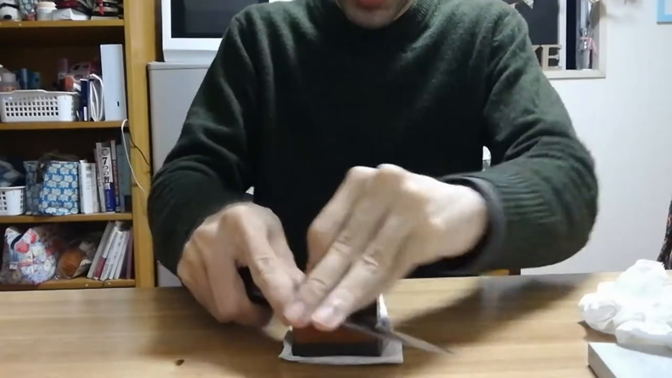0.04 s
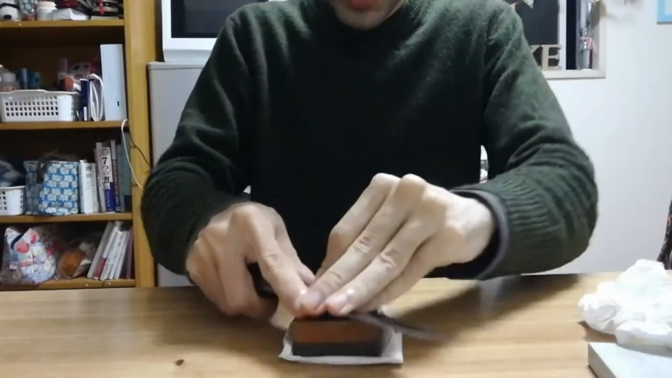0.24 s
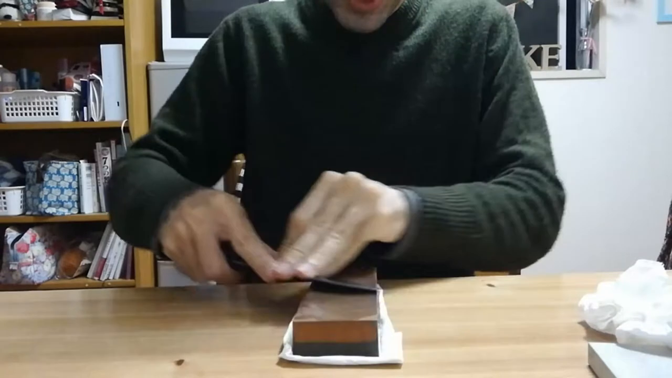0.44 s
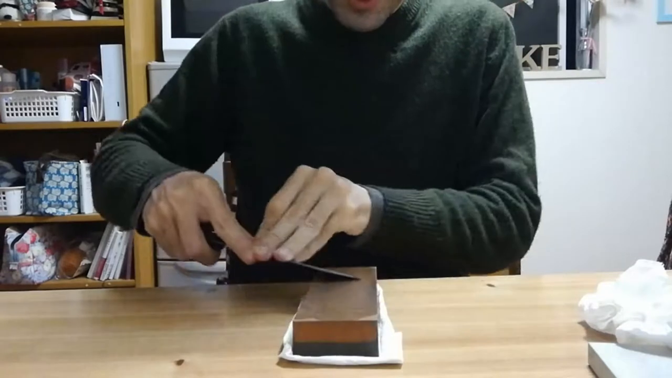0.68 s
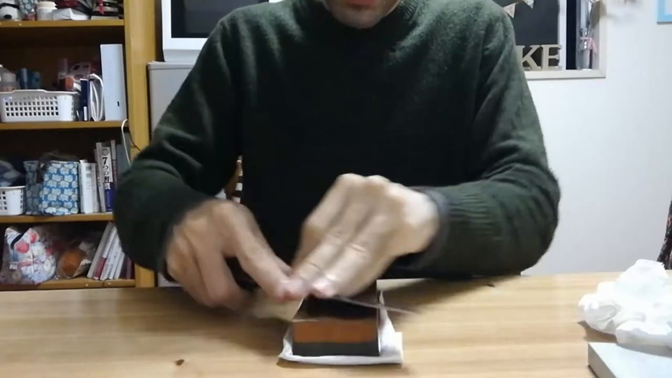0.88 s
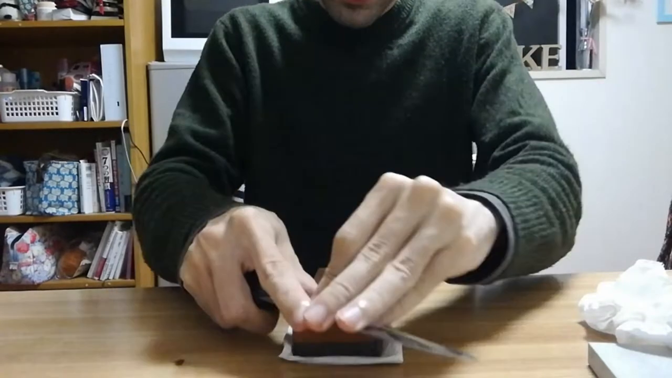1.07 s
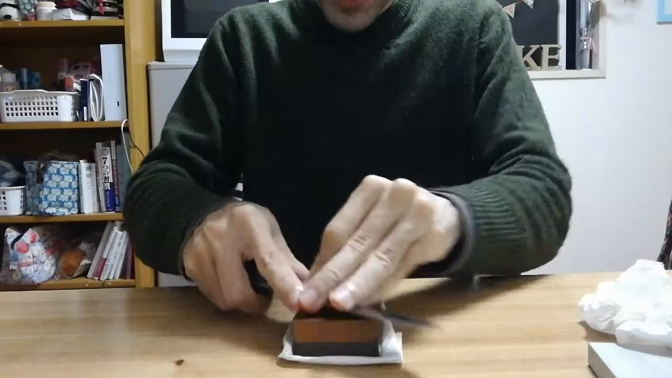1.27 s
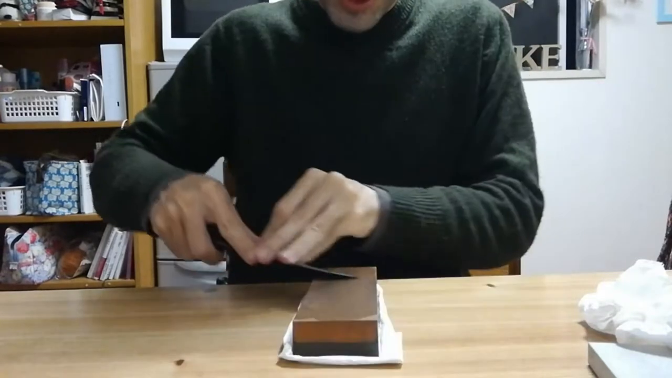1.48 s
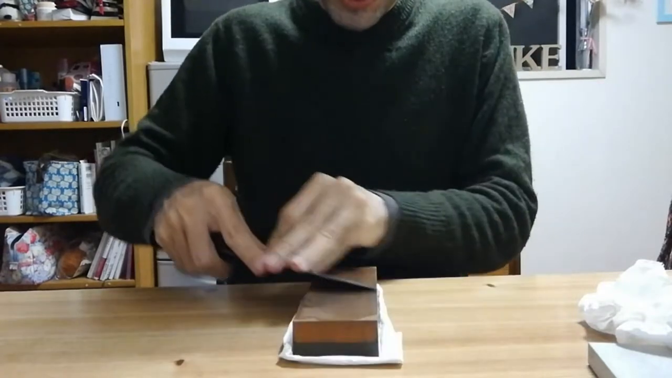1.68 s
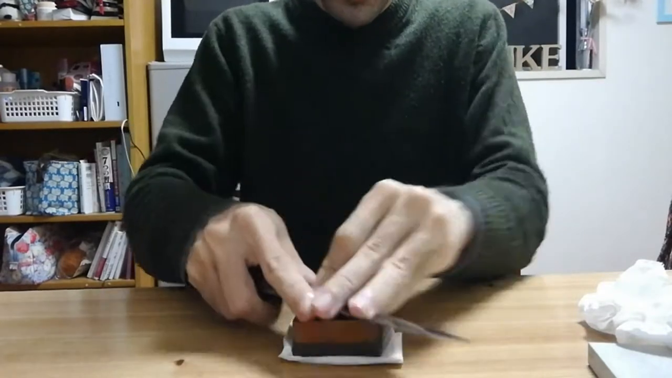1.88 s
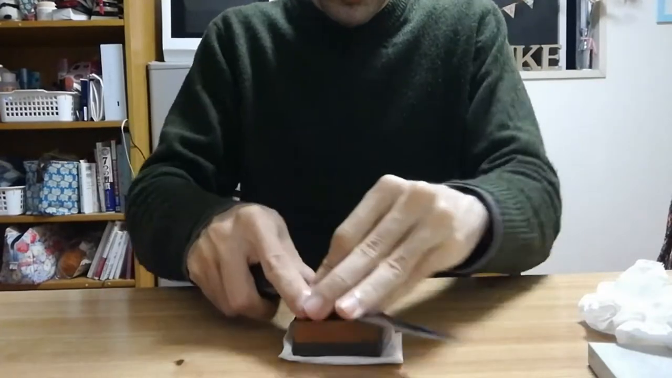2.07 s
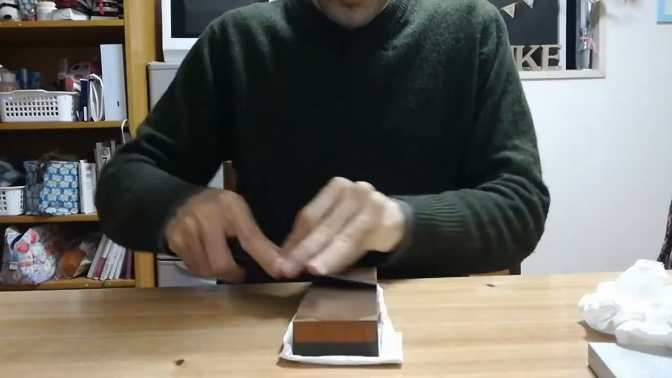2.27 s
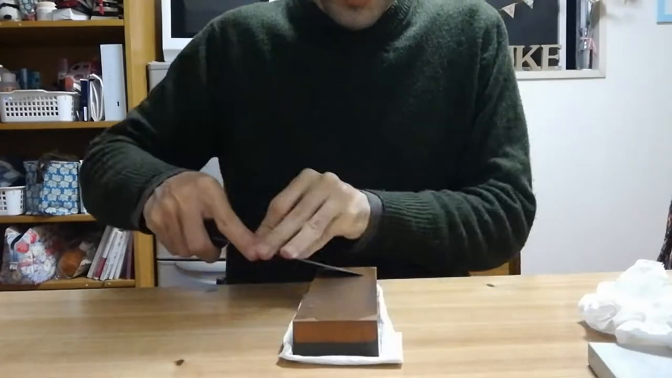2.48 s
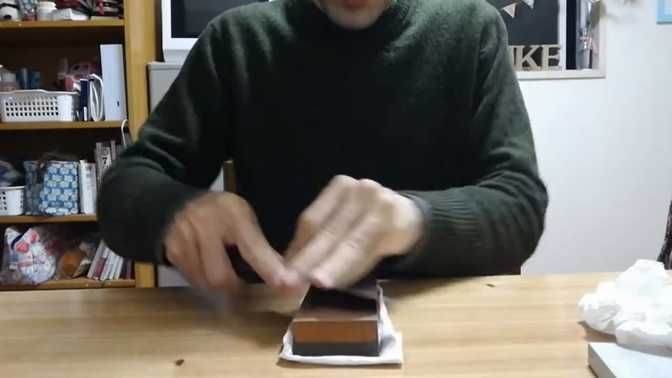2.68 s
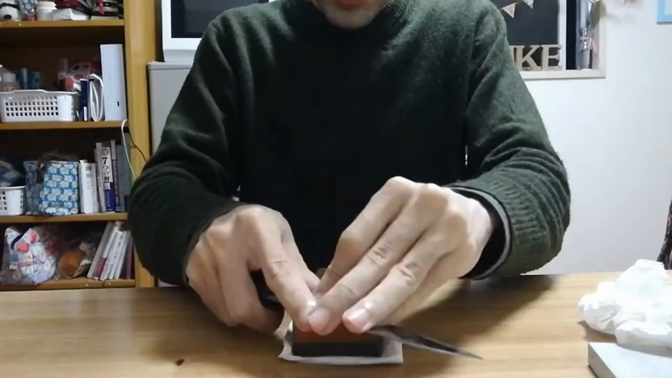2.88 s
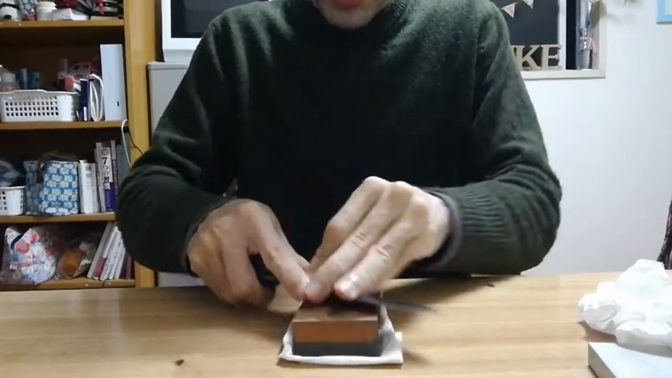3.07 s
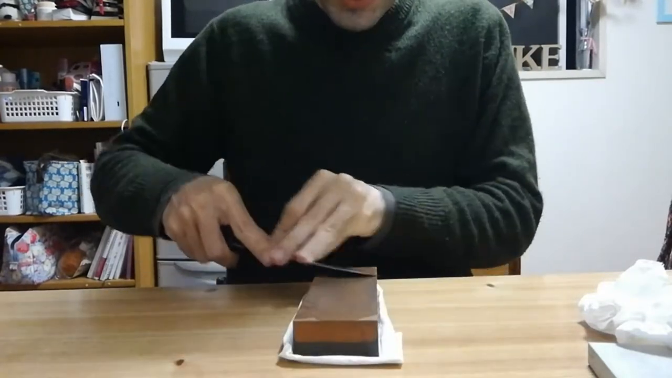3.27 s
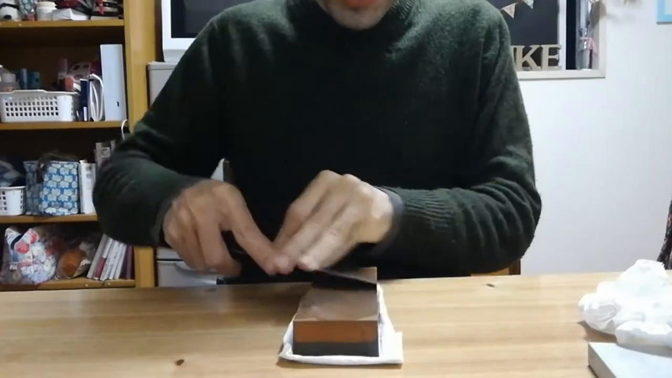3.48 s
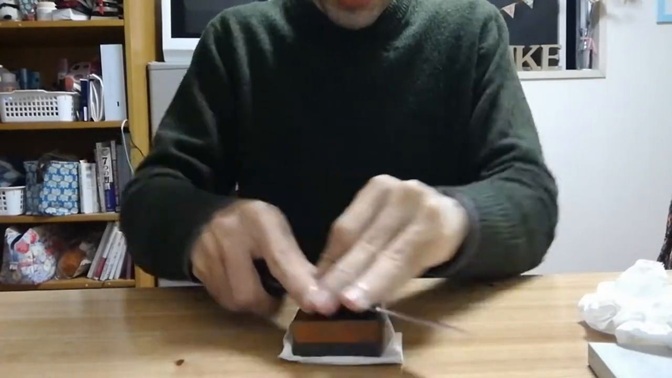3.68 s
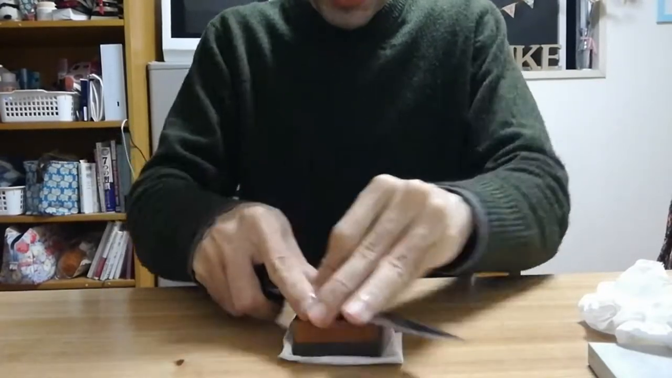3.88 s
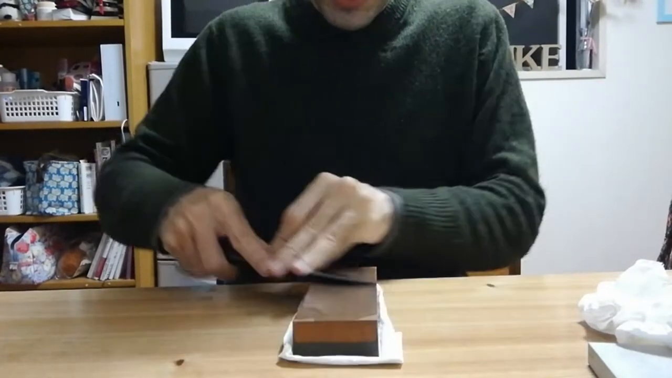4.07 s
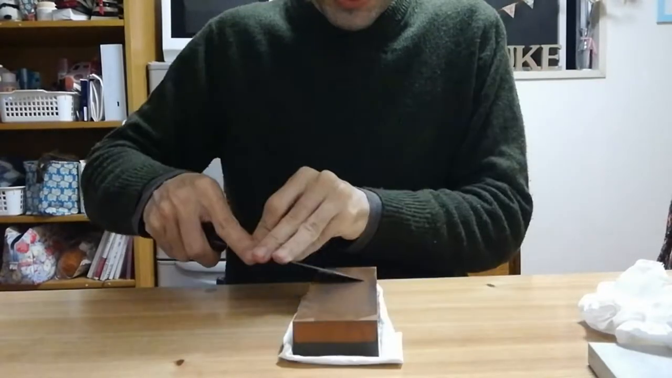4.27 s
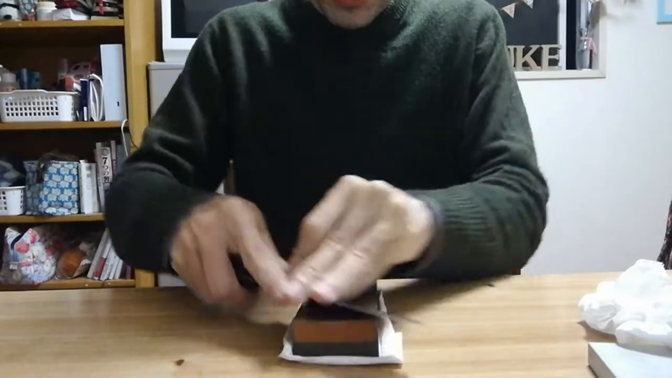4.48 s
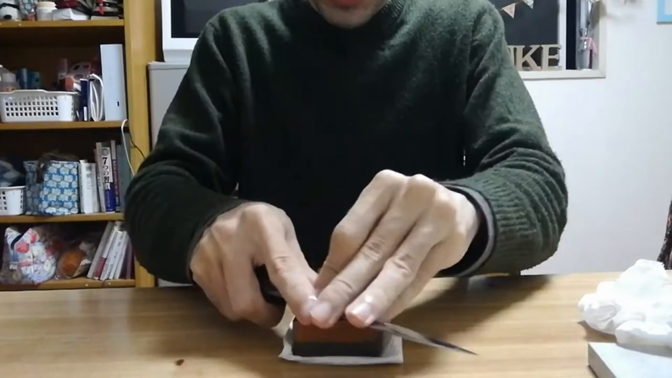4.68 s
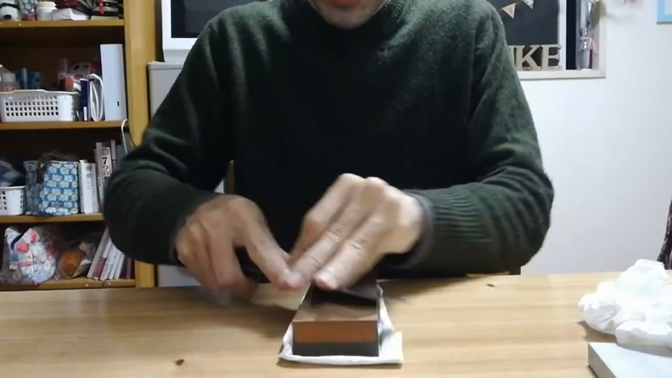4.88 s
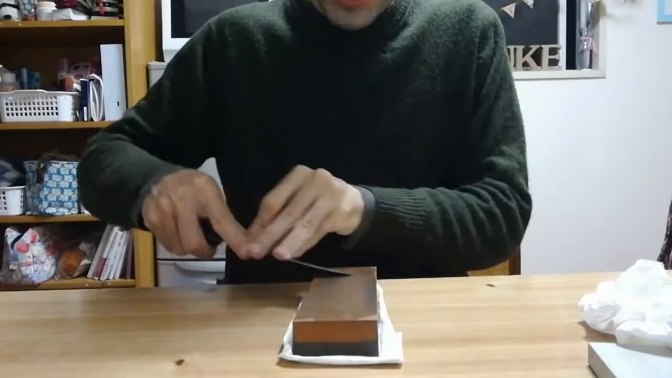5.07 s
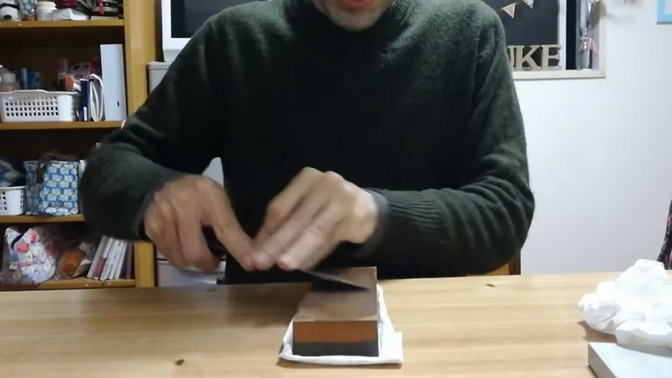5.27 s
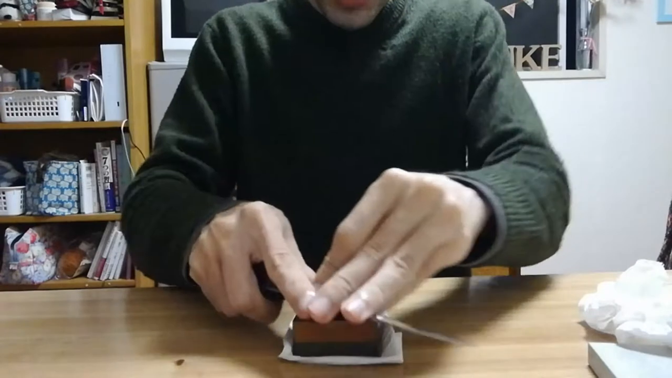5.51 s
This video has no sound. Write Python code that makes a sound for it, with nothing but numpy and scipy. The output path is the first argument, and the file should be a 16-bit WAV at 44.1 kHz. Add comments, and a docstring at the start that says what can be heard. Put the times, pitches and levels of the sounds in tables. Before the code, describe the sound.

Rhythmic knife sharpening: smooth hissing draws and abrupt, harsher ringing pushes of steel over wet stone, close by, with quiet mains hum beneath.

```python
"""A steel knife works along an oiled whetstone on a wooden table: six draws towards the body, pushes between.
Random grains of grit hiss under the edge and ring the blade, whose bending modes glide with its overhang.
Draws cross the stone smoothly; pushes creep, then lunge. At times the edge digs in or catches.
Reflections give the table, hands and small room; sines make mains hum and a motor, noise a low rumble.
The hardest strokes overload the microphone."""
import sys
import numpy as np
from scipy import signal
from scipy.fft import rfft, irfft
from scipy.io import wavfile
from scipy.ndimage import uniform_filter1d

SR = 44100
rng = np.random.default_rng(int(sys.argv[2]) if len(sys.argv) > 2 else 0)


def generate_wav(sig):
    """Save sig (samples, or channels by samples) to the path in sys.argv[1] as 16-bit PCM at SR."""
    pcm = np.round(np.clip(np.atleast_2d(sig).T, -1, 1) * 32767).astype(np.int16)
    wavfile.write(sys.argv[1], SR, pcm)


N = 244578
TIME = np.arange(N) / SR
BINS = np.fft.rfftfreq(N, 1 / SR)

# strokes towards the body: start t/s, fastest t/s, end t/s, half length of fast part/s,
# time scale of crossing mid-stone/s, relative levels of rasp/dB, bite/dB, flexing/dB
DRAWS = [(0.157, 0.335, 0.6, 0.16, 0.055, -12, -15, -24.0),
         (1.104, 1.272, 1.563, 0.15, 0.047, -11.5, -13, -24.5),
         (1.987, 2.195, 2.459, 0.22, 0.051, -13, -15.5, -25.5),
         (2.913, 3.122, 3.354, 0.067, 0.042, -13, -14, -23),
         (3.779, 3.962, 4.225, 0.19, 0.0461, -12, -14, -25),
         (4.651, 4.833, 5.126, 0.19, 0.043, -14, -15.5, -28)]
# strokes away from the body, same columns
PUSHES = [(-0.345, -0.15, 0.098, 0.09, 0.02, -8.5, -11, -24),
          (0.624, 0.818, 1.043, 0.067, 0.022, -15.5, -18, -29.5),
          (1.55, 1.749, 1.938, 0.086, 0.019, -11.5, -15.5, -24.5),
          (2.486, 2.696, 2.892, 0.073, 0.018, -12, -14.5, -22),
          (3.368, 3.58, 3.764, 0.077, 0.0273, -10.5, -13.5, -21),
          (4.214, 4.481, 4.647, 0.053, 0.019, -9, -8.5, -16.5),
          (5.158, 5.414, 5.586, 0.084, 0.025, -11, -11.5, -20)]


def amp(db):
    """Decibels to gain."""
    return 10 ** (np.asarray(db) / 20)


def unit(x):
    """Scales to rms 1."""
    return x / np.sqrt(np.mean(x ** 2) + 1e-20)


def read(points):
    """Interpolates a table over log frequency."""
    hz, value = np.transpose(points)
    return np.interp(np.log(BINS + 1), np.log(hz + 1), value)


def colour(x, points):
    """Filters by a table of f/Hz, level/dB."""
    return irfft(rfft(x) * amp(read(points)), N)


def wander(rate_hz):
    """Smooth noise of rms 1, rolled off above rate_hz."""
    spectrum = rfft(rng.standard_normal(N)) / (1 + (BINS / rate_hz) ** 4)
    return unit(irfft(spectrum, N))


def fade(kicks, t60_s):
    """Each kick jumps up at once and decays exponentially, 60 dB in t60_s."""
    decay = np.exp(-np.log(1000) / (t60_s * SR))
    return signal.lfilter([1], [1, -decay], kicks)


def bell(at_s, half_length_s):
    """Gaussian hump of height 1, down to 1/e at half_length_s."""
    return np.exp(-((TIME - at_s) / half_length_s) ** 2)


def travel(strokes):
    """Stone lengths covered so far: one smooth step around the fastest moment of each stroke."""
    return sum(.5 + .5 * np.tanh((TIME - fastest_s) / (2 * crossing_s))
               for _, fastest_s, _, _, crossing_s, *_ in strokes)


def overhang_pitch():
    """Lowest bending mode in Hz: inverse square of the length that hangs over the stone."""
    long_hz, shortening = 684, .47  # pitch at full overhang; share of it that a draw takes away
    drawn_in = 1 + travel(DRAWS) - travel(PUSHES)
    return long_hz / (1 - shortening * drawn_in) ** 2


def rubbing(strokes, law, lift):
    """Gains of rasp, bite and flexing: each stroke arches between turns and swells where the hands are fastest."""
    power, swell_db, fade_db = np.transpose(law)[:, :, None]
    lead_s, lift_length_s, *lift_db = lift
    gains = np.zeros((3, N))
    for start_s, fastest_s, end_s, fast_length_s, _, *levels_db in strokes:
        now = (TIME > start_s) & (TIME < end_s)
        done = (TIME[now] - start_s) / (end_s - start_s)
        arch = 1 - (2 * done - 1) ** 2
        surge = 1 / (1 + ((TIME[now] - fastest_s) / fast_length_s) ** 2)
        db = np.array(levels_db)[:, None] + swell_db * (surge - 1) - fade_db * (done - .5)
        # the edge rides light: change of bite and flexing only
        db[1:] += np.outer(lift_db, bell(fastest_s - lead_s, lift_length_s)[now])
        gains[:, now] += arch ** power * amp(db)
    return gains


def effort():
    """Gains over draws and pushes: pressing fingers dig the edge in, and it stays on the stone at the turns."""
    # rows rasp, bite, flexing: power of the arch, swell of the fast part/dB, fade from start to end/dB
    draw_law = [(1.31, 6.5, 12.5), (1.15, 11, 12), (1.55, 8, 16)]
    push_law = [(0.61, 15.2, -1.5), (0.54, 18.1, 5.5), (0.32, 25.9, -4)]
    # light-riding edge: lead before fastest moment/s, half length/s, change of bite/dB, of flexing/dB
    draw_lift = (0, 0.06, -9, 1)
    push_lift = (.049, .035, -11, 0.5)
    # edge digging in: t/s, half length/s, nominal gain/dB before the shares below
    digs = [(0.053, 0.028, 6), (0.21, 0.035, 6), (0.386, 0.04, 3), (0.695, 0.024, 4.6), (0.99, 0.0066, 7.5),
            (1.033, 0.025, 10.5), (1.133, 0.006, 5.1), (1.835, 0.014, 9), (1.938, 0.013, 20.5),
            (2.416, 0.039, 8), (2.523, 0.017, 6.5), (2.874, 0.054, 16), (3.003, 0.039, 7),
            (3.199, 0.031, 6.0), (3.642, 0.016, 4), (3.747, 0.014, 11), (4.035, 0.029, 3.5),
            (4.151, 0.022, 6), (4.576, 0.037, 11.5), (4.888, 0.018, 4), (5.46, 0.012, 5), (5.522, 0.01, 10)]
    # share of a dig's dB that reaches rasp, bite, flexing
    dig_shares = (0.74, 1, 1)
    # relative gain added at all times, so left at rest: rasp/dB, bite/dB, flexing/dB
    rest_db = (-45, -47, -71)
    ease_s = 0.01  # the hands ease each turn

    dig_db = sum(db * bell(at_s, half_length_s) for at_s, half_length_s, db in digs)
    strokes = rubbing(DRAWS, draw_law, draw_lift) + rubbing(PUSHES, push_law, push_lift)
    pressed = strokes * amp(np.outer(dig_shares, dig_db))
    eased = uniform_filter1d(pressed, 1 + round(ease_s * SR), axis=1)
    return eased + amp(rest_db)[:, None]


def grains(per_s, spread_db, smooth):
    """Grit on steel: random clicks of uneven size over a wash of finer ones."""
    size = amp(spread_db * np.minimum(rng.exponential(1, N), 5))
    clicks = size * rng.choice([-1, 1], N) * (rng.random(N) < per_s / SR)
    return unit(unit(clicks) + smooth * rng.standard_normal(N))


def friction_flutter():
    """The edge grabs suddenly and lets go slowly, over a fast random flutter; rms 1."""
    grabs = fade(rng.exponential(1, N) * (rng.random(N) < 90 / SR), t60_s=0.23)
    return unit((1 + 0.14 * grabs) * amp(0.66 * wander(rate_hz=1700)))


def grit_hiss(flutter):
    """Dense grains, fluttering with the friction and coloured as hiss; rms 1."""
    # colour of the hiss: f/Hz, relative level/dB
    grit = [(300, -49), (800, -32), (1500, -20), (2500, -11.5), (3700, -6), (5000, -7), (7000, -5),
            (10000, -4.5), (11200, -4.5), (12700, -1), (14000, -1), (15600, 0.5), (17000, -0.5),
            (20000, -7.5)]
    return unit(colour(flutter * grains(per_s=4000, spread_db=3.5, smooth=1.0), grit))


def resonate(x, hz, width_hz):
    """A resonance that may glide: shift hz to zero, two equal one-pole low-passes, shift back; rms 1."""
    turn = np.exp(2j * np.pi * np.cumsum(hz * np.ones(N)) / SR)
    r = np.exp(-np.pi * width_hz / SR)
    return unit((turn * signal.lfilter([1], [1, -2 * r, r * r], x / turn)).real)


def blade_ring(flutter):
    """Grains ring gliding bending modes and steady modes of the blade."""
    # bending modes of the overhang: multiple of the lowest, width of each pole/Hz, relative level/dB
    bending = [(1, 120, .5), (2.15, 400, -1.5), (3.2, 700, -4), (4.6, 900, -6), (6.6, 1000, -6),
               (9.8, 900, 2)]
    # steady modes of the gripped blade: f/Hz, width of each pole/Hz, relative level/dB
    steel = [(1620, 100, -3), (2280, 200, -5), (3130, 220, -5), (3900, 200, -14), (4770, 260, -9),
             (6300, 900, -5), (7200, 800, -2), (7700, 400, -4), (8200, 200, -6), (9020, 400, -9)]

    def contact():
        """Each mode is fed by its own stretch of the edge."""
        return flutter * grains(per_s=2500, spread_db=4.0, smooth=0.59)

    # the blade rocks under the fingers: pitch wavers, most where it glides fast
    pitch_hz = overhang_pitch()
    glide_per_s = uniform_filter1d(abs(np.gradient(np.log(pitch_hz), TIME)), SR // 30)
    lowest_hz = pitch_hz * np.exp((.01 + .006 * glide_per_s) * wander(rate_hz=60))
    # a short overhang rings more weakly
    reach = (lowest_hz / lowest_hz.mean()) ** -.5
    gliding = sum(amp(db) * resonate(contact(), k * lowest_hz, width_hz) for k, width_hz, db in bending)
    steady = sum(amp(db) * resonate(contact(), hz, width_hz) for hz, width_hz, db in steel)
    return reach * gliding + steady


def edge_catches():
    """The edge catches on the grit: sudden gains that die away."""
    # catches: t/s, relative level/dB
    catches = [(.135, -37.5), (0.191, -20), (0.98, -34), (1.116, -38), (1.133, -27), (1.998, -49),
               (2.491, -35), (2.51, -27), (2.684, -13), (2.985, -23), (3.369, -38), (3.575, -31),
               (3.803, -26), (3.907, -33), (4.491, -26), (4.538, -23), (5.16, -51), (5.404, -14.5)]
    kicks = np.zeros(N)
    for at_s, db in catches:
        kicks[round(at_s * SR)] = amp(db)
    return fade(kicks, t60_s=0.033)


def knife():
    """Grit under the moving edge hisses and rings the blade; strokes and catches set the gains."""
    # colour of the edge's bite: f/Hz, relative level/dB
    edge_band = [(300, -99), (2000, -25.5), (3400, -24.5), (4500, 3), (7000, 0), (9200, 1.5), (12000, -60),
                 (16000, 3.5)]
    # colour of the blade's flexing: f/Hz, relative level/dB
    radiation = [(300, -28), (650, -35), (950, -13.5), (1300, -5), (1600, -1), (3200, 4.5), (4500, -24),
                 (7000, -6.5), (16000, -27)]

    rasp, bite, flex = effort()
    catch = edge_catches()
    rasp = rasp + catch
    bite = bite + catch
    flex = flex + amp(-12.0) * catch
    flutter = friction_flutter()
    hiss = grit_hiss(flutter)
    ring = blade_ring(flutter)
    edge = unit(colour(ring, edge_band))
    body = unit(colour(ring, radiation))
    return amp(0.5) * rasp * hiss + amp(-1.5) * bite * edge + amp(-2.03) * flex * body


def reflections(x, t60_s, gap_s, size):
    """Sparse echoes of random sign that die away, different at each microphone."""
    t = np.arange(size) / SR
    taps = rng.choice([-1, 1], (2, size)) * (rng.random((2, size)) < 6000 / SR)
    taps = taps * (t > gap_s) * np.exp(-np.log(1000) * t / t60_s)
    taps /= np.linalg.norm(taps, axis=1, keepdims=True) + 1e-12
    return signal.oaconvolve(x[None], taps, axes=1)[:, :N]


def scatter(x, place, count):
    """Each place along the stone has its own early echoes; the blade glides from one set to the next."""
    place = (place - place.min()) / np.ptp(place) * (count - 1)
    shares = (np.cos(np.pi / 2 * np.clip(place - k, -1, 1)) for k in range(count))
    return sum(reflections(x * share, t60_s=0.043, gap_s=0.00025, size=2048) for share in shares)


def room(x):
    """Direct sound, scatter from table and hands that shifts as they travel, and the room's short tail."""
    # phase between microphones: f/Hz, lead of left/rad
    lead = [(300, -12), (600, 3), (950, 1.2), (1600, 1.7), (2400, -0.64), (3400, -0.36), (4400, 3.5),
            (5400, 0.8), (8000, 2), (10500, 1.5), (13500, 1), (16000, -1.4)]
    # level between microphones: f/Hz, left minus right/dB
    tilt = [(100, 7), (260, 16), (600, 0), (1000, 6), (1450, 0), (1850, -5), (2900, -1), (3400, -1.5),
            (4900, -1), (6200, -0.5), (7000, 7), (8900, 5.5), (11500, 0.5), (15500, -3.5)]
    # colour of the scatter from hands and table: f/Hz, relative level/dB
    scatter_colour = [(300, -4), (1600, -8.5), (4000, 1), (16000, 0.5)]

    half_lead = np.array([[.5], [-.5]]) * read(lead)
    direct = irfft(rfft(x) * np.exp(1j * half_lead), N)
    # no two strokes follow quite the same path
    place = np.log(overhang_pitch()) + .12 * wander(rate_hz=4.1)
    near = amp(-.5) * scatter(colour(x, scatter_colour), place, count=24)
    far = amp(-15.5) * reflections(x, t60_s=0.23, gap_s=0.0064, size=16384)
    wet = amp(-3.5) * direct + near + far
    half_tilt_db = np.array([[.5], [-.5]]) * read(tilt)
    return irfft(rfft(wet) * amp(half_tilt_db), N)


def background():
    """Steady sines of mains hum and a motor, over low noise partly alike at the two microphones."""
    # mains hum and a motor: f/Hz, rms level/dB
    hum_lines = [(100, -32.5), (145, -52), (323, -54)]
    # likeness of the rumble at the microphones: f/Hz, left-right correlation
    likeness = [(30, 0.85), (90, 1), (160, 1), (300, 0.77), (420, -0.2), (560, -0.56), (780, -0.81),
                (1000, 0.19), (8000, -0.58)]
    # colour of the rumble: f/Hz, relative level/dB
    rumble_colour = [(20, -11), (50, -15), (68, -7.5), (88, -1.5), (120, -3.5), (165, 1), (200, -0.5),
                     (265, -5.5), (320, -7), (400, -11.5), (700, -16.5), (1200, -22), (5000, -26),
                     (16000, -32)]

    hum = sum(amp(db) * np.sqrt(2) * np.sin(2 * np.pi * (hz * TIME + rng.random())) for hz, db in hum_lines)
    a, b = rfft(rng.standard_normal((2, N)))
    same = np.clip(read(likeness), -1, 1)
    air = irfft(np.array([a, same * a + np.sqrt(1 - same ** 2) * b]), N)
    return hum + amp(-39.5) * unit(colour(air, rumble_colour))


def scene():
    """Knife and stone in the room, over hum and rumble."""
    return room(knife()) + background()


def record(dry):
    """Clipping overloads with a dull crackle; a linear-phase low-pass then limits the band."""
    cutoff_hz = 15850
    clipped = np.clip(dry, -1, 1)
    low_pass = signal.firwin(601, cutoff_hz, window=("kaiser", 8), fs=SR)
    return signal.oaconvolve(clipped, low_pass[None], "same", axes=1)


dry = scene()
out = record(dry)
generate_wav(out)
```